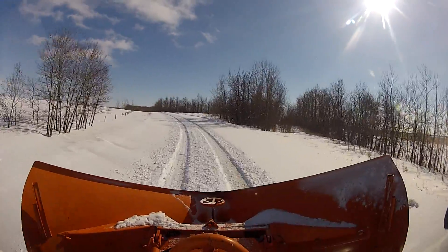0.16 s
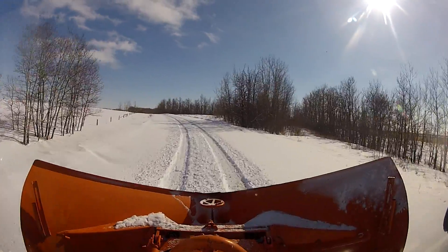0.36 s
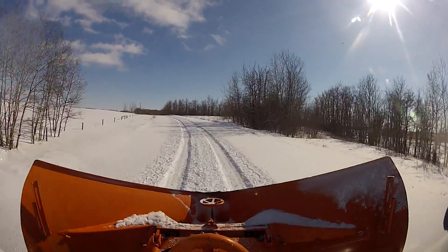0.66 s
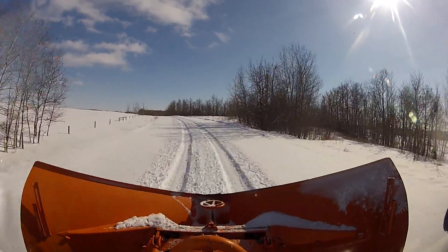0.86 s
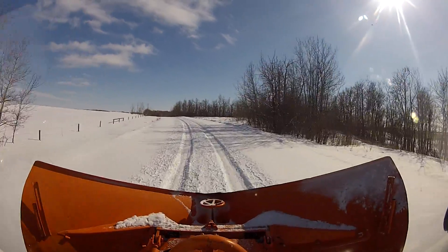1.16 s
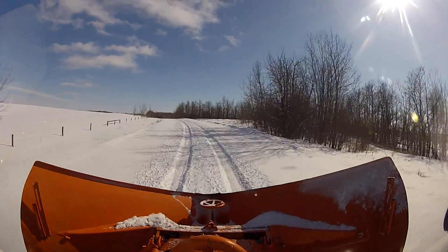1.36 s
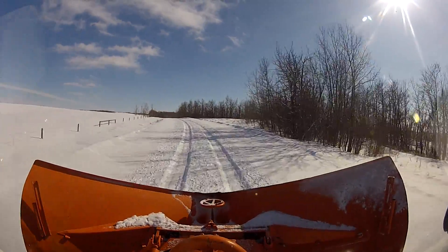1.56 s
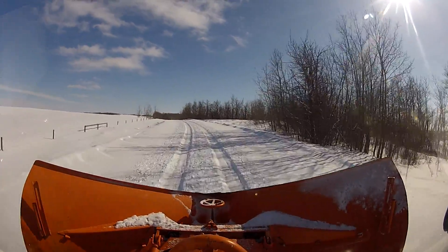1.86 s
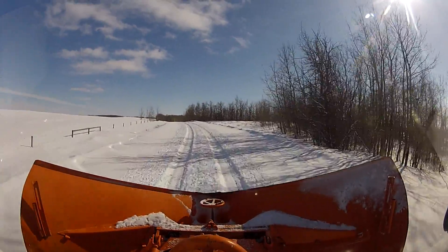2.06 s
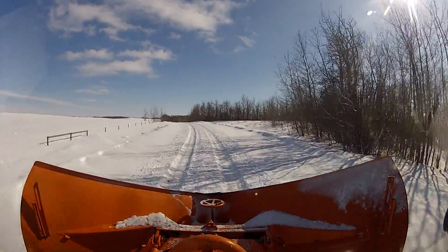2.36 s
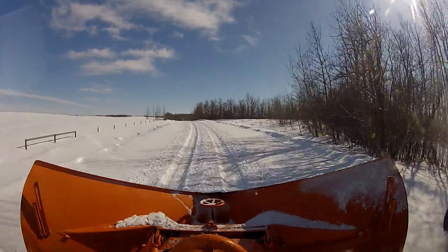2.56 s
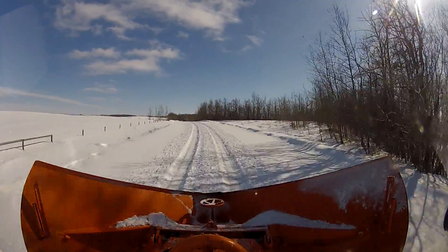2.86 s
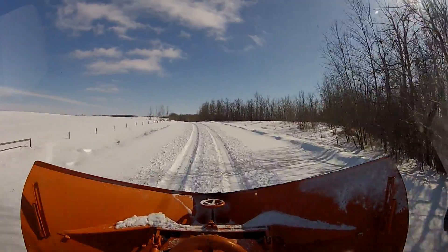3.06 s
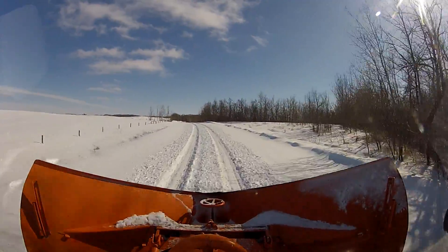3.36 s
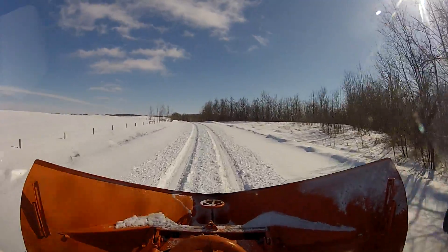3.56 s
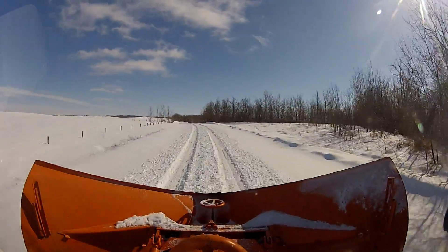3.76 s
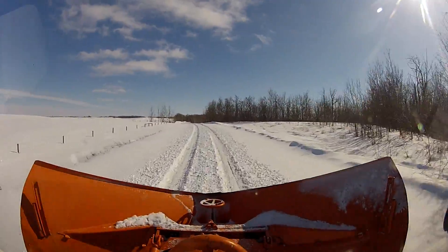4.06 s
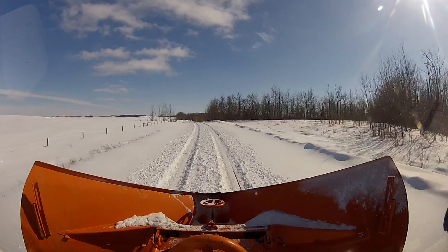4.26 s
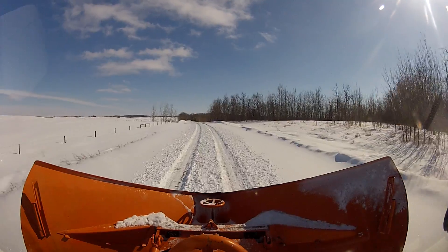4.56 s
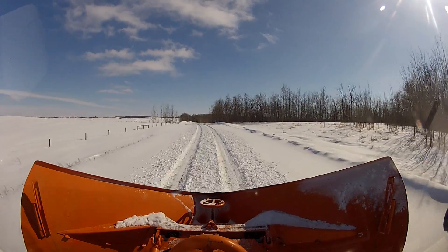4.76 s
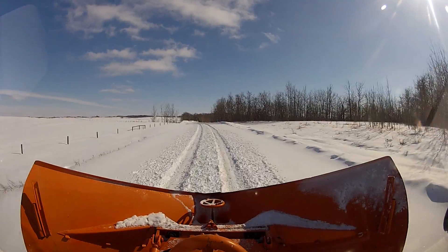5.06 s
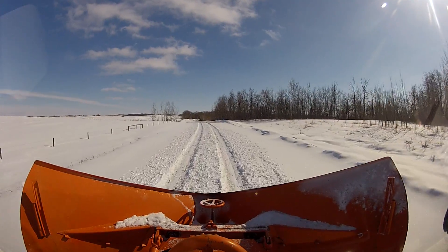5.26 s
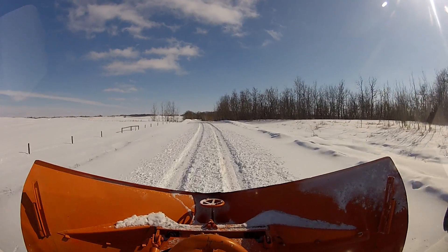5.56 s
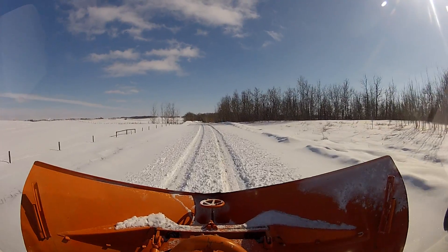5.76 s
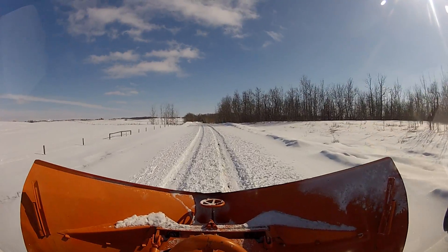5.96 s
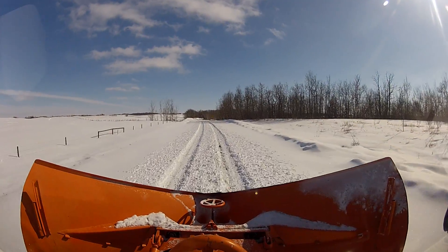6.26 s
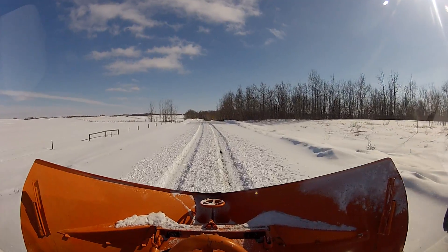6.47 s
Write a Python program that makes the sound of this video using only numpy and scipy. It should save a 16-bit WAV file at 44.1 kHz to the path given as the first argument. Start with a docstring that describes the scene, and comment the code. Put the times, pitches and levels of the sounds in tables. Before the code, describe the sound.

A diesel plough truck rumbles over snow with a few sharp knocks, drops to idle, then revs up again with a whine.

```python
"""A diesel plough truck on a snowy track, heard from a sealed camera case bolted to the cab.
In the first second a loose part knocks on the case, overloading a coarsely sampling recorder that
ducks its gain. The engine pulls until 2 s, then sinks to idle for a gear change. From 4.3 s it revs
up and a panel buzzes; at 5.4 s the gear bites and whines. Throughout, the tyres roll over the snow
and the road shakes the body into a low boom."""
import sys
import numpy as np
from scipy import signal
from scipy.fft import rfft, irfft
from scipy.io import wavfile
from scipy.ndimage import minimum_filter1d

SR = 44100
rng = np.random.default_rng(int(sys.argv[2]) if len(sys.argv) > 2 else 0)


def dump_mix(stems):
    """Bounce the given channels to the path in sys.argv[1] as a 16-bit WAV at rate SR."""
    frames = np.atleast_2d(stems).T  # one column per channel
    limited = np.clip(frames, -1, 1)  # hard clip at full scale
    pcm = np.round(limited * 32767).astype(np.int16)
    wavfile.write(sys.argv[1], SR, pcm)


N = 292383

# Engine speed: time_s, firing_hz
FIRING_RATE = [(0, 75), (2.0, 73), (2.12, 68), (2.5, 56.2), (2.8, 48.2), (3.1, 40), (3.42, 32.4),
               (4.32, 33.1), (4.5, 39), (4.73, 50.5), (4.83, 58.3), (5.0, 64.5), (5.31, 76), (5.4, 84.3),
               (5.48, 87.3), (5.6, 88.4), (6.0, 85.4), (6.3, 82.3), (6.63, 80.3)]
# Loudness of the engine's clatter and of its wavering firing tone: time_s, clatter_db, firing_tone_db
ENGINE_LEVELS = [(0, -38.5, -18), (.5, -38, -26), (1, -38.5, -36), (1.5, -38, -27), (2.02, -38.5, -24),
                 (2.05, -44, -20.5), (2.4, -49, -34.5), (3.5, -51, -34), (4.38, -51, -35),
                 (4.48, -46, -31.5), (5, -46, -32.5), (5.4, -44, -49), (6, -44.5, -53), (6.63, -45, -52)]
# Harmonics that follow the firing tone's level: order, relative_db
LOW_HARMONICS = [(2, -25), (5, -46)]
# Fourth order as the cab carries it to the case: pitch_hz, level_db
FOURTH_ORDER_RESPONSE = [(120, -44), (134, -41), (148, -32), (162, -37), (178, -48), (200, -46), (240, -38),
                         (262, -40), (280, -44), (300, -52), (326, -62), (336, -52), (360, -52)]
# Rough harmonics heard off load: order, relative_db
ROUGH_HARMONICS = [(12, 2), (16, -1)]
# The cab's passband for the rough harmonics: pitch_hz, level_db
ROUGH_PASSBAND = [(520, -76), (600, -54), (680, -55), (770, -54), (830, -78)]
# Their prominence, greatest as the revs fall: time_s, gain_db
OVERRUN_GAIN = [(0, -12), (2.15, -12), (2.25, 0), (3.4, 0), (4.3, -7), (6.63, -7)]
# Broad spectrum of combustion noise: frequency_hz, relative_db
CLATTER_SPECTRUM = [(180, -34.5), (300, -11), (332, -16), (442, -17.5), (583, -12), (1440, -11.5),
                    (2070, -9.5), (2460, -5), (3210, -19.5), (6000, -40), (7800, -71), (13200, -120)]
# Engine block resonances: centre_hz, width_hz, gain_db
BLOCK_MODES = [(726, 200, 8), (1084.5, 41, 10.5), (1260, 30, 2), (1546, 88, 7), (1827, 120, 9.5),
               (2160, 37, 8), (2532, 71, 7), (2945, 70, 7), (3580, 77, 10), (4260, 110, -12)]
# Cover rung by the injectors: time_s, level_db
INJECTOR_LEVEL = [(0, -43), (1, -41), (1.45, -42.5), (2.02, -44), (2.04, -66), (4.4, -66), (4.6, -60),
                  (6.63, -58)]
# Resonances of frame, cab and bracket: centre_hz, stage_width_hz
BODY_MODES = [(26, 9.2), (68, 7.3), (228, 17.8)]
# Their excitation by the road: time_s, frame_db, cab_db, bracket_db
BODY_SHAKE = [(0, -27, -28, -30), (1.2, -27.5, -21, -34.5), (2.2, -30, -29, -38), (3.2, -26, -30.5, -39),
              (4.2, -27.5, -29.5, -37), (5.0, -28, -30.5, -32), (5.4, -34.5, -36, -39.5),
              (5.8, -32.5, -25.5, -40), (6.63, -27.5, -34, -40)]
# Bumps in the track: centre_s, level_db
TRACK_BUMPS = [(.11, -15.5), (.55, -27), (.92, -15.5), (1.12, -24), (1.42, -20), (1.8, -23), (2.7, -24),
               (3.22, -17.5), (3.5, -25), (3.68, -17.5), (4.03, -20), (4.43, -22.5), (4.96, -21.5),
               (5.34, -19.5), (5.82, -16.5), (6.13, -24), (6.3, -27)]
# Throbs of the third order: centre_s, drive_db
THIRD_ORDER_THROBS = [(.04, -23.5), (.55, -26), (1.08, -19), (1.58, -26), (1.85, -30), (2.06, -29), (5.32, -27)]
# Blows of the loose part on the case: start_s, strength_db, bounce_relative_db
CASE_BLOWS = [(0.139, -11.5, -8), (0.2164, -6, -5.5), (0.255, -20, -4), (.7570, -11, -4.5)]
# Modes of the struck case: pitch_hz, relative_db, t60_s
STRUCK_MODES = [(242, -1.5, 0.019), (472, -10.5, 0.027), (654, -14, 0.015), (953, -2, 0.0083),
                (1505, 1, 0.0077), (1757, -1.5, 0.015), (2820, -40, .008), (3160, -16, 0.0043),
                (4060, -15.5, 0.023), (5000, -6, 0.0031)]
# Soft jolts of the mount: start_s, strength_db
MOUNT_JOLTS = [(0.092, -14), (.109, 1), (.116, -25)]
# Gear whine, loud once the gear bites: time_s, level_db
WHINE_LEVEL = [(0, -58), (2, -59), (2.3, -57), (2.7, -61), (3, -74), (5.36, -72), (5.40, -42), (5.55, -38),
               (5.75, -37), (6, -41), (6.18, -43), (6.24, -50), (6.63, -52)]
# Driveline hum: time_s, level_db
DRIVELINE_LEVEL = [(0, -22.5), (.35, -28.5), (.62, -20), (.95, -20.5), (1.3, -31.5), (2.3, -27), (3.4, -24),
                   (4.2, -33.5), (5.2, -27.5), (5.5, -48), (6.63, -45)]
# Noise of tyres, snow and drivetrain: frequency_hz, relative_db
ROLLING_SPECTRUM = [(8.8, -26.5), (15, -1), (69, -8), (82, -8), (94, -16.5), (133, -20), (175, -18),
                    (231, -12.5), (328, -40.5), (695, -36.5), (788, -47), (939, -44.5), (1040, -55.5),
                    (2560, -45), (6000, -93.5), (7800, -119), (13200, -120)]
# Strength of that noise: time_s, level_db
ROLLING_LEVEL = [(0, -24), (1, -27), (2, -28.5), (2.6, -29), (3.3, -32), (4, -30.5), (4.6, -28.5),
                 (5.3, -28), (5.8, -26), (6.2, -28.5), (6.63, -28)]
# Case resonances under steady noise: centre_hz, width_hz, gain_db
CASE_MODES = [(721, 162, 7.5), (915, 150, 7.5), (1470, 140, 6.5), (1700, 240, 12), (2160, 45, 10),
              (2480, 54, -4), (3535, 150, 12)]
# Panel buzzing as the revs climb: time_s, level_db
PANEL_LEVEL = [(4.4, -83), (4.55, -54.5), (4.9, -55), (5.25, -53), (5.4, -73)]
# Air hiss at the intake: time_s, level_db
INTAKE_LEVEL = [(0, -64.5), (2.0, -69), (2.08, -70.5), (4.4, -75.5), (5.2, -69), (5.45, -64), (6, -65.5),
                (6.63, -67.5)]
# Faint ticks in the cab: start_s, level_db
CAB_TICKS = [(2.8105, -50), (3.1554, -60)]


def engine_orders(firing_hz, firing_db):
    """Periodic firing yields a harmonic series; the cab transmits each order according to its pitch."""
    out = tone(firing_hz, firing_db + 1.1 * drift(8.6))
    for order, db in LOW_HARMONICS:
        out += tone(order * firing_hz, firing_db + db + 1.8 * drift(1.3))
    out += tone(4 * firing_hz, at_hz(FOURTH_ORDER_RESPONSE, 4 * firing_hz) + 3.5 * drift(9))
    overrun_db, = in_time(OVERRUN_GAIN)
    for order, db in ROUGH_HARMONICS:
        hz = order * firing_hz * (1 + .006 * drift(25))
        out += tone(hz, db + overrun_db + at_hz(ROUGH_PASSBAND, hz) + 3.5 * drift(8))
    return out


def combustion_clatter(firings, clatter_db):
    """Amplitude modulation: noise swells at each firing and is filtered by the block's modes."""
    pulse_db = np.cos(2 * np.pi * firings) + 0.32 * np.cos(np.pi * firings)   # alternately harder
    bursts = amp(pulse_db + 0.53 * drift(6.7)) * rng.standard_normal(N)
    return amp(clatter_db) * coloured(bursts, CLATTER_SPECTRUM, BLOCK_MODES)


def injector_rattle(firings, weak_db=-9):
    """An impulse train, one tick per firing and every other one weaker, rings a cover."""
    count = np.floor(firings)
    ticks = np.diff(count, prepend=0) * amp(weak_db * (count % 2) + 1.6 * drift(8))
    cab_wall = signal.butter(2, [2150, 2850], "band", fs=SR, output="sos")
    rattle = signal.sosfilt(cab_wall, ring(ticks, hz=2460, t60_s=.035))
    return amp(in_time(INJECTOR_LEVEL)[0]) * rattle / rattle.std()


def body_boom(swing_hz=25.9):
    """Random excitation: the road shakes three body modes, and bumps set the frame swinging."""
    boom = np.zeros(N)
    for (hz, width_hz), db in zip(BODY_MODES, in_time(BODY_SHAKE)):
        shake = resonance(rng.standard_normal(N), hz, width_hz)
        shake = resonance(shake, hz, width_hz)   # a second stage narrows the peak
        boom += amp(db) * shake / shake.std()
    return boom + swells(TRACK_BUMPS, sigma_s=0.042) * tone(swing_hz + 1.87 * drift(3.77), db=0)


def bracket_boom(firing_hz, centre_hz=221, split_hz=11, reach_hz=9, pull_db=2.5):
    """Forced resonance: the third or fourth order nears a close pair of camera bracket modes."""
    third = swells(THIRD_ORDER_THROBS, sigma_s=0.098) * tone(3 * firing_hz, 0.45 * drift(14))
    nearness = np.exp(-.5 * ((4 * firing_hz - centre_hz) / reach_hz) ** 4)
    revving_up = np.gradient(firing_hz) > 0
    fourth = nearness * tone(4 * firing_hz, db=-18 + pull_db * revving_up)
    return sum(resonance(third + fourth, centre_hz + side * split_hz / 2, width_hz=8) for side in (-1, 1))


def case_knocks(bounce_s=.0031, rebound_s=0.00128):
    """Impact excites free vibration: the case wall rings and springs back; the part bounces once."""
    strengths = amp(1.83 * rng.standard_normal((len(CASE_BLOWS), len(STRUCK_MODES))))
    taps, ringing = np.zeros((2, N))
    for (hz, mode_db, t60_s), mode_strengths in zip(STRUCK_MODES, strengths.T):
        for (start_s, db, bounce_db), strength in zip(CASE_BLOWS, mode_strengths):
            taps[round(start_s * SR)] = amp(db) * strength
            taps[round((start_s + bounce_s) * SR)] = amp(db + bounce_db) * strength
        ringing -= amp(mode_db) * ring(taps, hz, t60_s)   # the wall moves inward first
    hits = impulses(CASE_BLOWS)
    rebound = amp(8) * ring(np.roll(hits, round(rebound_s * SR)), hz=165, t60_s=0.012)
    crack = amp(-17) * decay(hits, tau_s=0.004) * band_noise(850, 3100)
    contact = signal.butter(2, 4000, fs=SR, output="sos")   # finite contact time dulls the blow
    return amp(10.5) * (signal.sosfilt(contact, ringing) + rebound + crack)


def mount_thuds():
    """A heavily damped oscillator: the mount answers each jolt with a dull thud."""
    lowpass = signal.butter(2, 420, fs=SR, output="sos")
    return signal.sosfilt(lowpass, ring(impulses(MOUNT_JOLTS), hz=120, t60_s=0.017))


def gear_whine(firing_hz, gear_order=8, shaft_order=3.7, shaft_relative_db=-17):
    """Fixed ratios of rotation lock a gear tone and a weaker shaft tone to the firing rate."""
    whine_db, = in_time(WHINE_LEVEL)
    gear = tone(gear_order * firing_hz, whine_db + 1.5 * drift(12))
    shaft = tone(shaft_order * firing_hz, whine_db + shaft_relative_db + 3.4 * drift(3))
    return gear + shaft


def driveline_hum(start_hz=70.5, slowing_hz_per_s=2.9):
    """A shaft's pitch is proportional to its rotation rate, so it sinks as the truck slows."""
    hz = start_hz - slowing_hz_per_s * np.arange(N) / SR + 0.68 * drift(2.76)
    return tone(hz, in_time(DRIVELINE_LEVEL)[0] + 1.5 * drift(8.1))


def rolling_noise():
    """Rolling contact makes broad, slightly lumpy noise, coloured by the case's resonances."""
    lumpy = amp(0.57 * drift(39) + 0.94 * drift(1)) * rng.standard_normal(N)
    return amp(in_time(ROLLING_LEVEL)[0]) * coloured(lumpy, ROLLING_SPECTRUM, CASE_MODES)


def panel_buzz(centre_hz=442, width_hz=29):
    """A resonant panel vibrates in a narrow band while the engine revs up."""
    buzz = band_noise(centre_hz - width_hz / 2, centre_hz + width_hz / 2)
    return amp(in_time(PANEL_LEVEL)[0]) * buzz


def intake_hiss():
    """Flow noise: air entering the intake hisses in a high band."""
    return amp(in_time(INTAKE_LEVEL)[0]) * band_noise(3700, 5300)


def cab_ticks():
    """Faint transients, each a bright burst of noise that decays exponentially."""
    return decay(impulses(CAB_TICKS), tau_s=.002) * band_noise(1200, 4600)


def amp(db):
    """Amplitude ratio of a level in decibels."""
    return 10 ** (np.asarray(db) / 20)


def in_time(rows):
    """Linear interpolation of each column after time_s, one value per sample."""
    time_s, *columns = np.transpose(rows)
    return [np.interp(np.arange(N) / SR, time_s, column) for column in columns]


def at_hz(spectrum, hz):
    """Interpolation of a spectrum on a logarithmic frequency axis."""
    frequency_hz, level_db = np.transpose(spectrum)
    return np.interp(np.log(hz), np.log(frequency_hz), level_db)


def drift(rate_hz, step=40, settle=2000):
    """Slow random fluctuation of unit spread: noise low-passed at about rate_hz."""
    pole = np.exp(-2 * np.pi * rate_hz * step / SR)
    noise = rng.standard_normal(N // step + settle + 2)
    slow = signal.lfilter([1], [1, -2 * pole, pole * pole], noise)[settle:]
    return np.interp(np.arange(N) / step, np.arange(len(slow)), slow / slow.std())


def tone(hz, db):
    """A sine of given rms level whose phase is the integral of its frequency."""
    return np.sqrt(2) * amp(db) * np.sin(2 * np.pi * (np.cumsum(hz) / SR + rng.random()))


def band_noise(low_hz, high_hz):
    """Band-limited noise of rms 1."""
    bandpass = signal.butter(2, [low_hz, high_hz], "band", fs=SR, output="sos")
    noise = signal.sosfilt(bandpass, rng.standard_normal(N))
    return noise / noise.std()


def coloured(x, spectrum, peaks):
    """Spectral shaping by a broad curve with resonance peaks and dips; rms 1."""
    hz = np.maximum(np.fft.rfftfreq(N, 1 / SR), 1)
    gain = amp(at_hz(spectrum, hz))
    for centre_hz, width_hz, db in peaks:
        gain *= amp(db / (1 + (2 * (hz - centre_hz) / width_hz) ** 2))
    shaped = irfft(rfft(x) * gain, N)
    return shaped / shaped.std()


def impulses(rows):
    """One impulse for each row beginning start_s, level_db."""
    clicks = np.zeros(N)
    for start_s, db, *_ in rows:
        clicks[round(start_s * SR)] = amp(db)
    return clicks


def decay(clicks, tau_s):
    """Exponential envelope after each impulse."""
    return signal.lfilter([1], [1, -np.exp(-1 / (tau_s * SR))], clicks)


def swells(rows, sigma_s):
    """Gaussian envelopes around each event, added in power."""
    t = np.arange(N) / SR
    return np.sqrt(sum((amp(db) * np.exp(-.5 * ((t - s) / sigma_s) ** 2)) ** 2 for s, db in rows))


def ring(clicks, hz, t60_s):
    """Damped oscillator: a unit impulse starts a decaying sine of height about 1."""
    r, w = amp(-60 / (t60_s * SR)), 2 * np.pi * hz / SR
    return signal.lfilter([0, np.sin(w)], [1, -2 * r * np.cos(w), r * r], clicks + 1e-18)


def resonance(x, hz, width_hz):
    """Two-pole resonator with unit gain at its peak."""
    r, w = np.exp(-np.pi * width_hz / SR), 2 * np.pi * hz / SR
    return signal.lfilter([(1 - r * r) / 2, 0, (r * r - 1) / 2], [1, -2 * r * np.cos(w), r * r], x)


def scene():
    """Superposition: all sources add at one microphone inside the case."""
    firing_hz, = in_time(FIRING_RATE)
    firings = np.cumsum(firing_hz) / SR
    clatter_db, firing_db = in_time(ENGINE_LEVELS)
    engine = engine_orders(firing_hz, firing_db)
    engine += combustion_clatter(firings, clatter_db) + injector_rattle(firings)
    structure = body_boom() + bracket_boom(firing_hz) + case_knocks() + mount_thuds()
    transmission = gear_whine(firing_hz) + driveline_hum()
    background = rolling_noise() + panel_buzz() + intake_hiss() + cab_ticks()
    return (engine + structure + transmission + background)[None]


def record(dry, limit_db=-4, slope=0.83, hold_s=0.01, release_db_s=110, attack_s=0.011,
           converter_hz=12000, cutoff_hz=16100):
    """Gain control ducks after overloads; the converter samples coarsely, clips and holds each value."""
    excess_db = np.maximum(20 * np.log10(np.abs(dry[0]) + 1e-9) - limit_db, 0)
    half_hold = round(hold_s * SR / 2)
    held_db = -minimum_filter1d(-slope * excess_db, size=2 * half_hold + 1, origin=half_hold)
    release_db = release_db_s * np.arange(N) / SR
    duck_db = np.maximum.accumulate(held_db + release_db) - release_db
    pole = np.exp(-1 / (attack_s * SR))
    ducked = dry * amp(-signal.lfilter([1 - pole], [1, -pole], duck_db))
    coarse = np.clip(signal.resample_poly(ducked, converter_hz, SR, axis=1), -1, 1)
    steps = np.repeat(coarse, 4, axis=1)   # held steps mirror the spectrum around the sampling rate
    wet = signal.resample_poly(steps, SR, 4 * converter_hz, axis=1)[:, :N]
    lowpass = signal.cheby2(16, 80, cutoff_hz, fs=SR, output="sos")
    return signal.sosfilt(lowpass, np.clip(wet, -.98, .98))


dry = scene()
out = record(dry)
dump_mix(out)
```